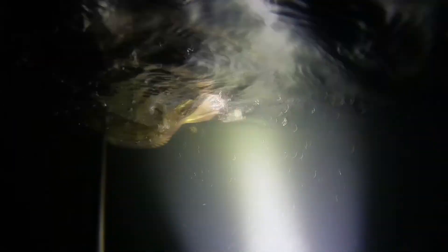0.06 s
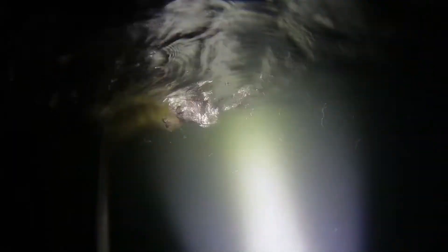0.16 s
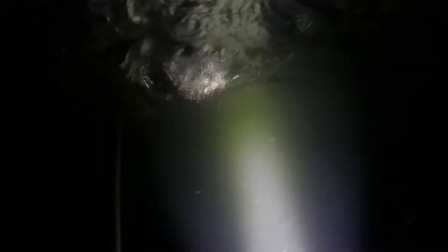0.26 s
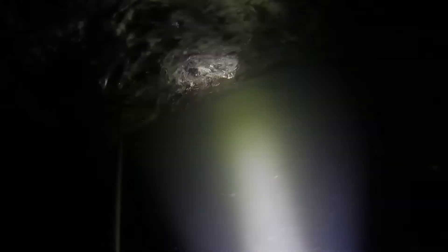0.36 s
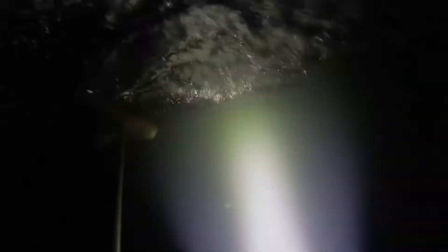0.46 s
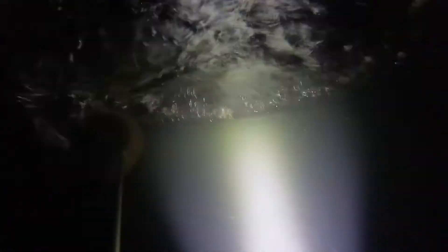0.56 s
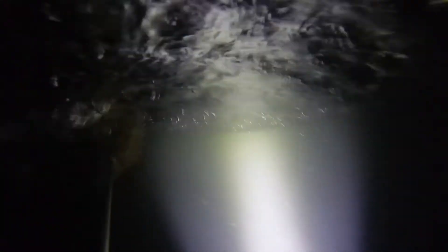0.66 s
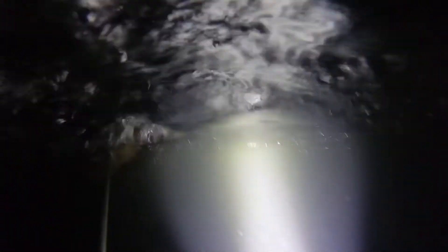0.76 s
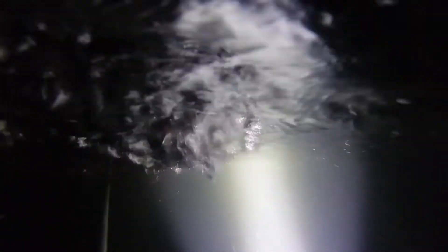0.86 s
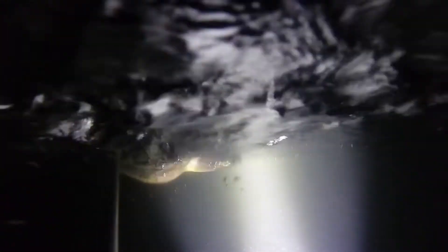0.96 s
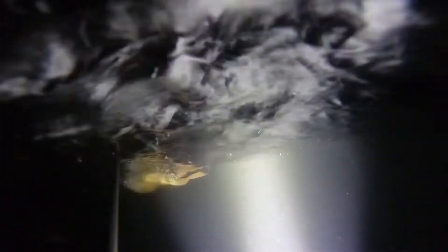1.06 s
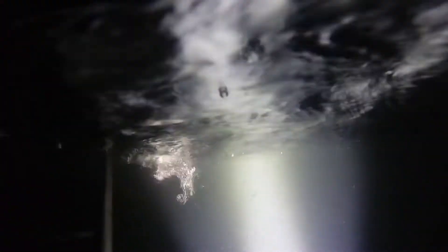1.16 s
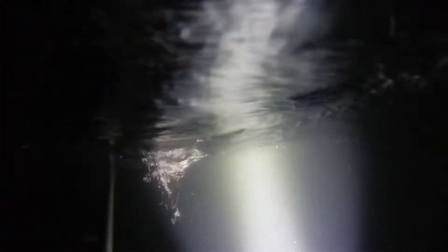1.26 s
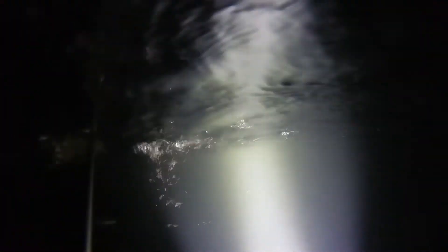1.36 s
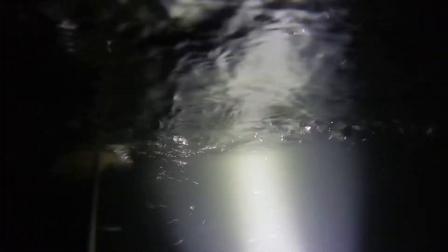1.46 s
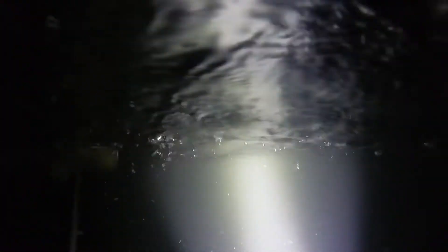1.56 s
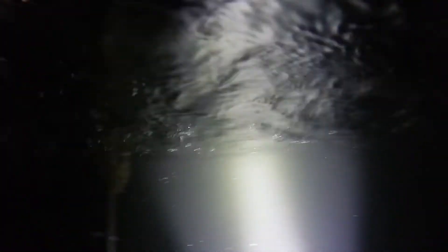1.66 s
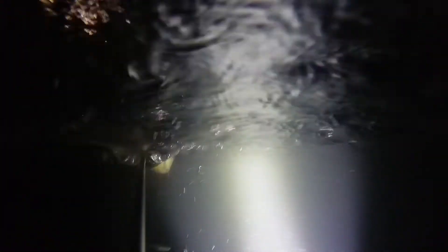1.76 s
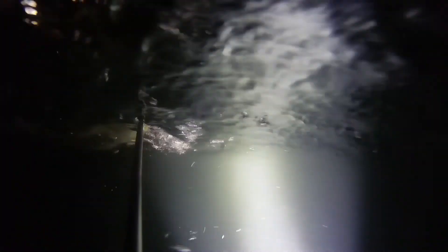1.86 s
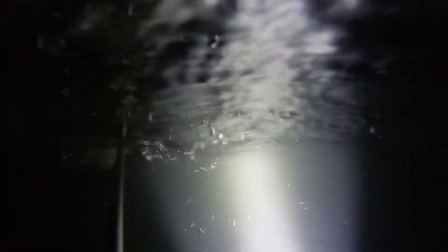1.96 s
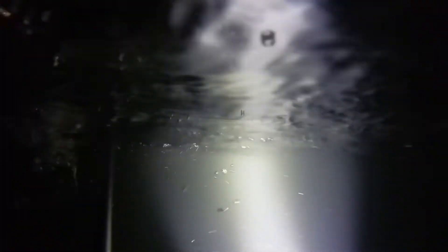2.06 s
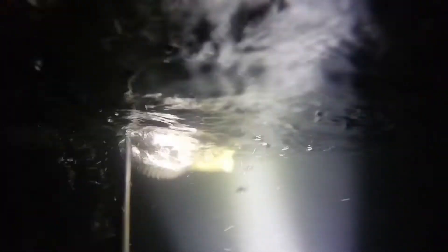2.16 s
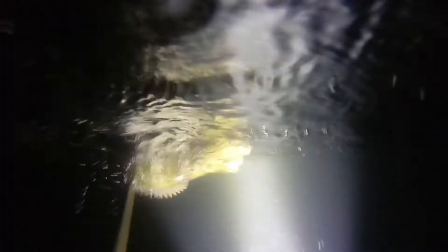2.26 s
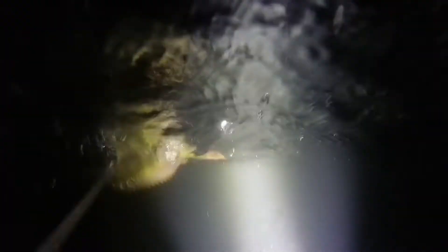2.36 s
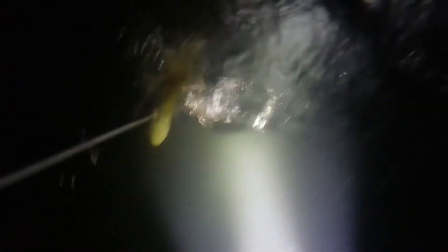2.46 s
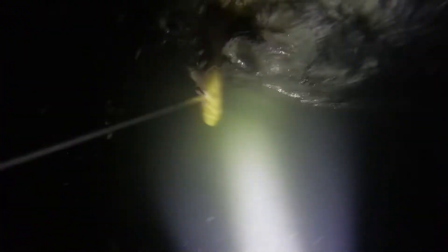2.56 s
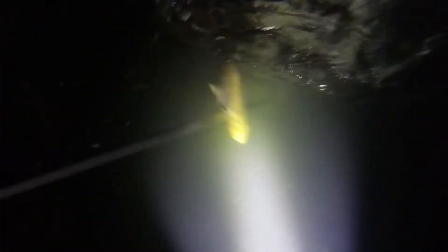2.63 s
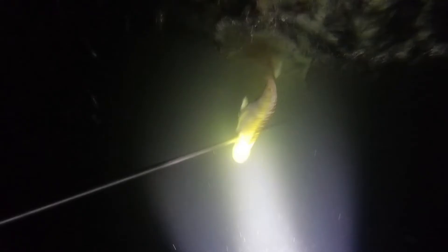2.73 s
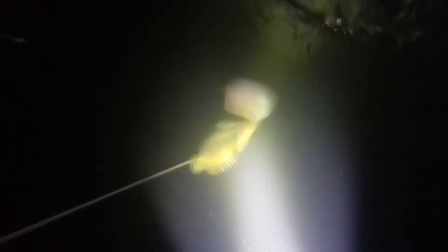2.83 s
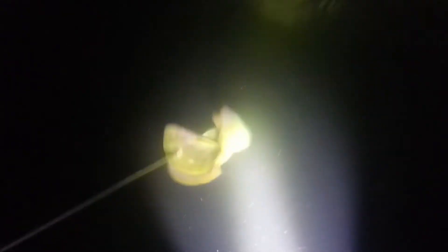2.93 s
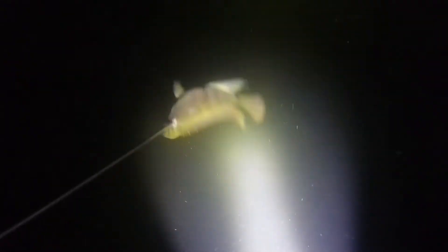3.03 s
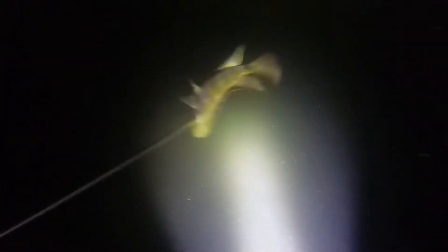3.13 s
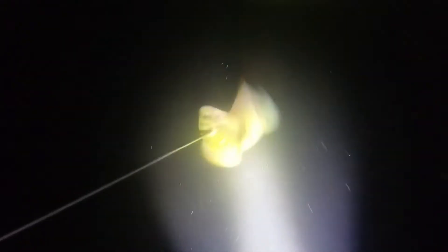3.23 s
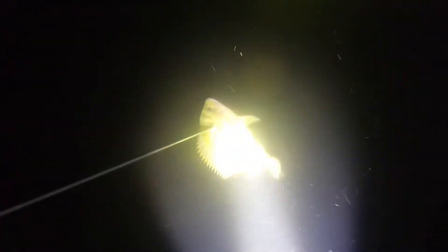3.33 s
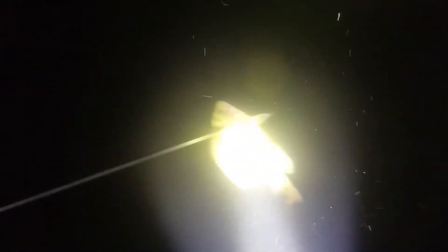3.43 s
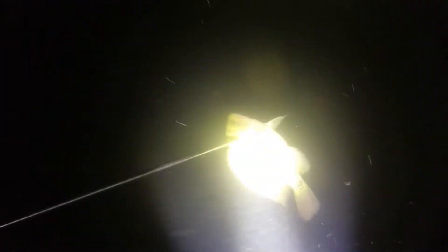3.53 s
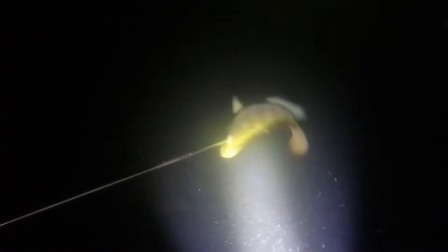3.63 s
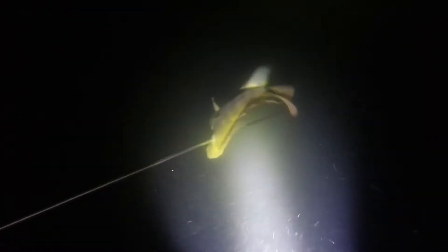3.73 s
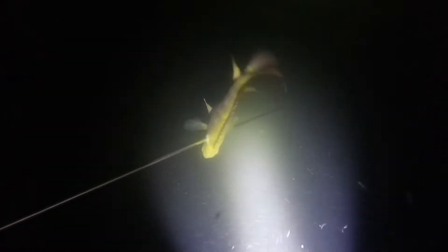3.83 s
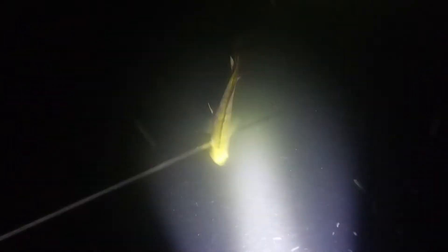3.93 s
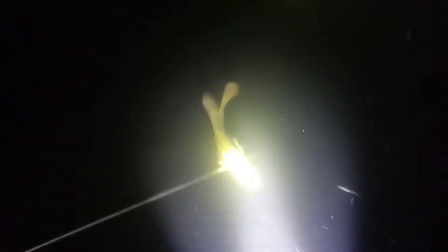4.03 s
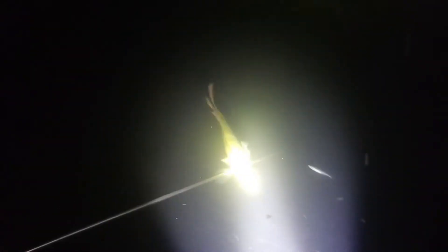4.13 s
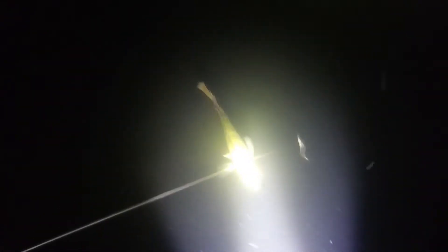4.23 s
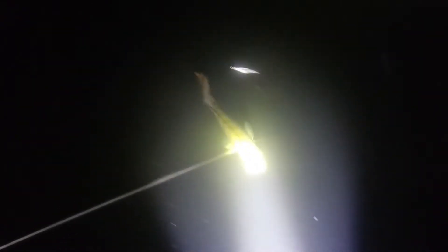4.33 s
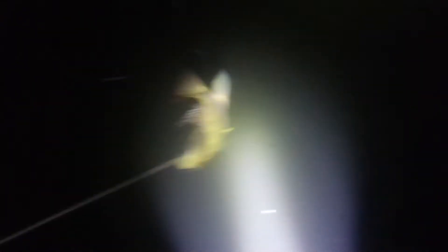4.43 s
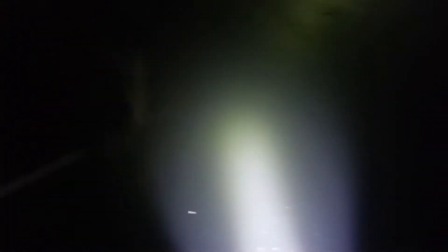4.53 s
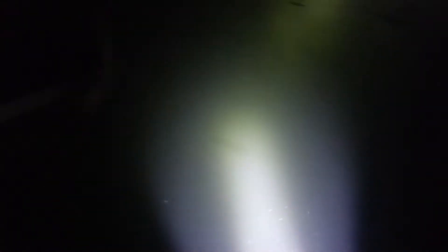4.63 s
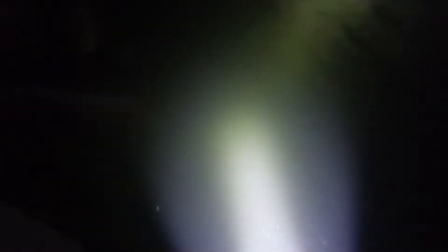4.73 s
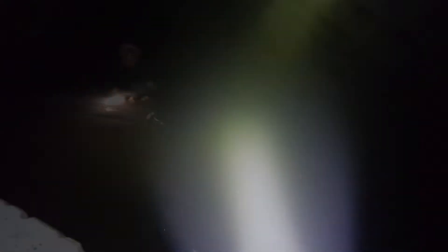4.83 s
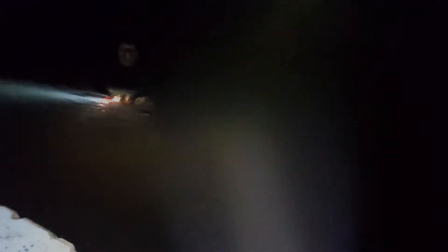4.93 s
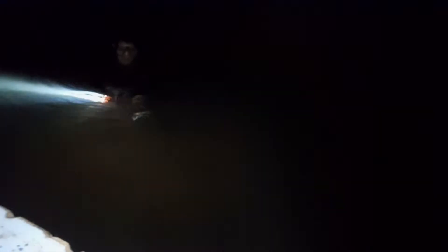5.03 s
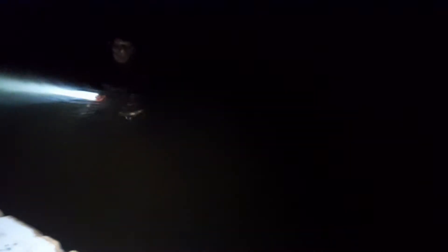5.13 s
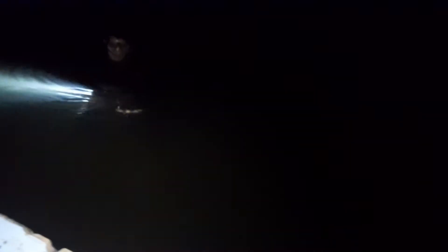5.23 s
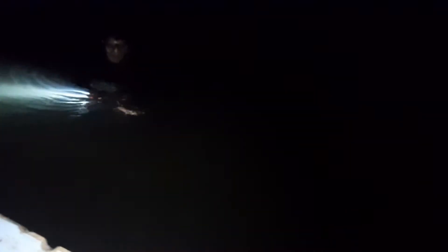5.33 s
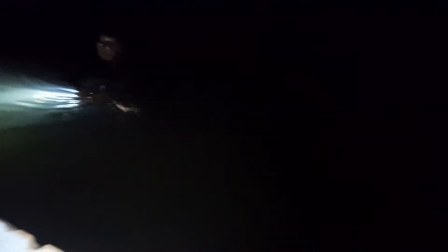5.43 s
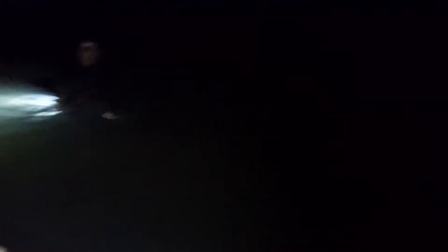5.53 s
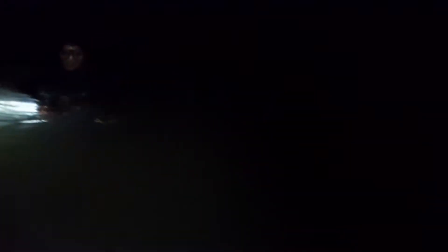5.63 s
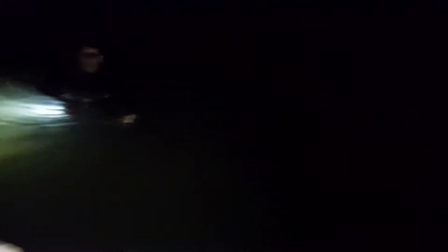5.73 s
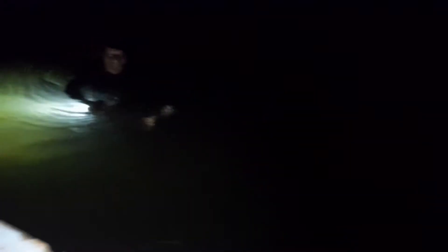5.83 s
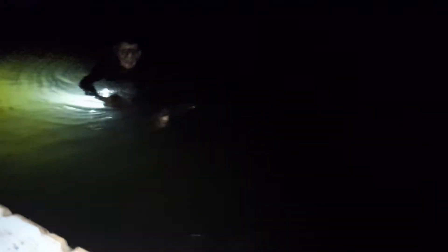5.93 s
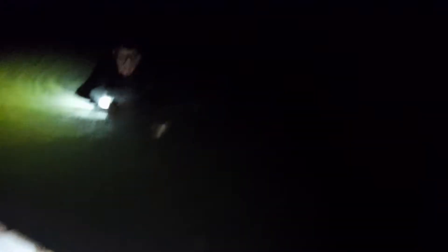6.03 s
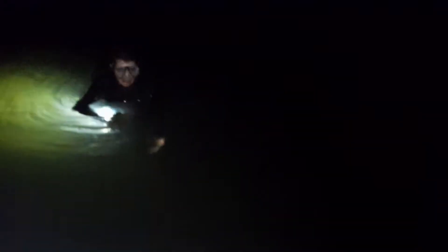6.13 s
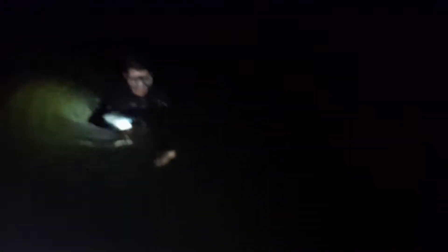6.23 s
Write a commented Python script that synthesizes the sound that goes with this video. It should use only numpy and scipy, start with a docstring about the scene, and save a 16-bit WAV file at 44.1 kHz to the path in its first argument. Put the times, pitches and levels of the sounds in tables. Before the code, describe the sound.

A microphone rides on a fishing spear, very close, underwater in a lake at night. From 0 to 0.35 seconds hard knocks judder rapidly, hollow shaft thuds mixed with bright, short steel rattles, while surging water clips the sound. Until 1.8 seconds there are sparser taps, deep swaying rumbles, gritty rubbing and small gliding bubble tones, with a strong shove near 1.2. Hard knocks return at 1.75-1.95 and 2.25-2.35. At 2.4-2.9 the fish wriggles in faint wet scrapes with bubbles popping. From 3 to 4.4 it is much quieter: subdued water, weak tugs, then a brief low hum at 4.45. At 4.7-5.0 clattering knocks and a distorted wet burst mark surfacing; water patters and gurgles off. A tick sounds near 5.15, then faint hiss, soft bumps and small drips around 5.4 and 5.8-6.0, ending with a dull bump.

```python
"""A fishing spear with a camera on it knocks and sweeps through a lake; it jabs a fish, which wriggles on the prongs.
Knocks ring damped shaft modes and rattle steel modes with noise bursts; many judder on in uneven rebounds.
Strokes stir shaped noise, scales scrape in tiny slips; bubbles, brief resonances and one low hum are gliding sines.
Hard knocks and surging water overload the microphone. Then the camera surfaces: water runs off it,
and a few drips, sharp ticks and soft bumps sound over a faint hiss."""
import sys
import numpy as np
from scipy import signal
from scipy.fft import rfft, irfft, next_fast_len
from scipy.io import wavfile
from scipy.ndimage import uniform_filter1d, map_coordinates

SR = 44100
rng = np.random.default_rng(int(sys.argv[2]) if len(sys.argv) > 2 else 0)


def unload_wav(signal):
    """Save mono or channel-first audio to the path in sys.argv[1] as 16-bit WAV at rate SR, clipped to [-1, 1]."""
    wavfile.write(
        sys.argv[1],
        SR,
        np.round(np.clip(np.atleast_2d(signal).T, -1, 1) * 32767).astype(np.int16),
    )


N = 277414

# Blows on the spear. Each row: start in seconds, relative shaft level in dB, relative steel level in dB,
# judder length in seconds.
KNOCKS = [(0.0, -2, 4, .075), (0.088, -11.5, -14.5, 0.0069), (0.110, -10, -4, .012),
          (0.129, -25, -21, 0.0024), (0.140, -8, -2.5, .013), (0.183, -31, -21, 0), (0.221, -37, -13, 0),
          (0.272, -28, -26, 0), (0.281, -14, -20.5, 0.0086), (0.307, -9.5, -16, .013),
          (0.342, -35, -24, 0.0042), (0.508, -36, -50.5, 0.0039), (0.854, -44.5, -44.5, 0),
          (0.922, -25.5, -45, 0.0011), (0.965, -47, -38, 0), (0.974, -50, -19.5, 0.00047),
          (1.035, -36, -30, 0), (1.088, -60.5, -41.5, 0.01), (1.141, -39, -32.5, 0.0011),
          (1.162, -38, -16.5, .011), (1.228, -29.5, -47, 0.012), (1.255, -20.5, -21.5, .016),
          (1.414, -41, -26, 0), (1.757, -20.5, -8, 0.00016), (1.888, 0.5, -16.5, 0.0036),
          (1.902, -6, -2.5, .027), (1.939, -22.5, -8.5, 0.002), (2.014, -33, -33, 0.00008),
          (2.184, -31, -64.5, 0.00039), (2.225, -34.5, -37, 0), (2.242, -6, -25, 0.0077),
          (2.316, -12.5, 2, .012), (2.333, -22.5, -27.5, 0), (3.134, -26.5, -74, 0.0044),
          (3.513, -35.5, -78, 0.0085), (3.832, -77.5, -59, 0), (4.295, -24, -58, 0.0065),
          (4.697, -42, -39.5, 0), (4.725, -33, -38, 0.00075), (4.743, -13, -17, 0),
          (4.753, -15.5, -1.5, .024), (4.792, -40, -15.5, 0.0055), (4.815, -22, -2, 0),
          (4.833, -40.5, -24, 0), (4.867, -28.5, -39.5, 0.0055), (4.933, -22.5, -16.5, .012),
          (5.021, -43, -27, 0.018)]
# Mean gap between rebounds; their mean loss against the blow and the standard deviation of their levels.
JUDDER_GAP_S, JUDDER_LOSS_DB, JUDDER_SCATTER_DB = 0.0085, 3, 5
# Bending modes of the shaft. Each row: nominal frequency in Hz, relative level in dB, T60 in seconds.
SHAFT_MODES = [(475.1, -1, 0.14), (433, -5.5, 0.051), (490, -15.5, 0.067), (658, -5, 0.019),
               (899, -44, 0.0083)]
# Modes of prongs and fittings. Each row: nominal frequency in Hz, relative level in dB, T60 in seconds.
STEEL_MODES = [(1520, 1, 0.0052), (1746, -7, 0.022), (2522, -0.5, 0.024), (3352, -9, 0.025),
               (3532, -10, 0.037), (4945, -9, 0.02), (5500, -13.5, 0.014), (6150, -16, 0.032),
               (7370, -33.5, 0.11)]

# Fish wriggling on the prongs. Each row: start in seconds, length in seconds, level in dB.
WRIGGLES = [(0.6, .015, -60), (0.845, .015, -62), (0.975, 0.0048, -46), (1.168, 0.015, -45),
            (1.775, .025, -58.5), (2.412, .025, -60.5), (2.467, 0.025, -54.5), (2.529, .018, -43),
            (2.565, 0.031, -54.5), (2.68, .04, -59.5), (2.77, .035, -58.5), (2.877, 0.012, -55.5),
            (3.07, 0.0056, -68.5), (3.515, 0.011, -72.5), (4.44, 0.0379, -67.5)]
WRIGGLE_ATTACK_S, WRIGGLE_RELEASE_S = 0.017, 0.045  # over 60 dB
# Resonances that the scales excite. Each row: nominal frequency in Hz, relative level in dB, T60 in seconds.
WRIGGLE_MODES = [(790, -6, 0.021), (1945, 0, 0.01), (2600, -2, 0.0086), (3390, -12, 0.016),
                 (3540, -11.5, 0.012), (4790, -5, 0.013), (8750, -14, 0.016), (15000, -11.5, .003)]
WRIGGLE_BUBBLES_DB = -6  # against the scraping

# Sweeps of the spear through the water. Each row: start in seconds, length in seconds,
# pressure sway in dB, rumble in dB, rubbing in dB.
STROKES = [(0.0, .1, -34.5, -36.5, -53), (0.125, 0.29, -23.5, -32, -52.5), (0.43, .14, -25, -47, -57.5),
           (0.62, 0.035, -55, -40.5, -56), (0.91, 0.14, -28.5, -42, -52.5), (1.185, .09, -19, -31, -60.5),
           (1.43, 0.68, -28, -47, -55), (1.89, 0.13, -20.5, -32, -55), (2.18, 0.093, -28.5, -39.5, -47),
           (2.26, .12, -29.5, -28.5, -63), (2.43, .37, -41.5, -44, -46), (2.83, 0.089, -40.5, -63, -54.5),
           (3.07, 0.092, -50, -66.5, -66.5), (3.5, 0.069, -57, -68.5, -72), (4.44, .18, -42.5, -50, -59.5),
           (4.71, 0.3, -37.5, -44.5, -55)]
STROKE_ATTACK_S, STROKE_RELEASE_S = 0.17, 0.28  # over 60 dB
# Slow heave of the spear, which also keeps a little water flowing. Each row: time in seconds, level in dB.
HEAVE = [(0, -24.5), (2.3, -30.5), (3, -34.5), (4.2, -36), (5, -30.5), (5.2, -88)]
# Spectrum of the pressure sway. Each row: frequency in Hz, relative level in dB.
SWAY_SPECTRUM = [(10, -13), (18, 2.5), (32, -3), (45, -11.5), (65, -29), (120, -110)]
# Spectrum of the turbulence. Each row: frequency in Hz, relative level in dB.
RUMBLE_SPECTRUM = [(30, -31), (55, -3.5), (90, 0), (150, -19), (230, -23), (400, -82), (800, -120)]
# Spectrum of the rubbing. Each row: frequency in Hz, relative level in dB.
RUB_SPECTRUM = [(100, -27), (220, -4.5), (320, 5), (420, 1.5), (480, 18), (560, -0.5), (680, -4),
                (900, -27), (2500, -34), (5000, -36), (7500, -33), (15000, -49)]
# Hardest shoves of water on the housing. Each row: start in seconds, relative level in dB, length in seconds.
SURGES = [(0.121, -5.5, 0.0076), (0.152, -3.5, .026), (0.288, -11.5, 0.0085), (0.323, 2.5, 0.018),
          (0.382, -10, 0.029), (0.919, -11, 0.033), (1.238, 1, 0.0089), (1.932, -8, 0.0067),
          (2.324, -4.5, 0.013), (4.606, -23, 0.025), (4.781, -0.5, 0.0061), (4.801, -5, 0.0073)]
# Bubbles, brief resonances and one low hum. Each row: start in seconds, frequency in Hz, level in dB,
# T60 in seconds, pitch glide over T60 as a share.
GLIDING_RINGS = [(0.649, 337, -38, 0.057, -0.053), (0.853, 548, -39, 0.11, 0.16),
                 (0.962, 531, -33.5, 0.37, 0.11), (1.036, 520, -32, 0.2, 0.19),
                 (1.414, 392, -25.5, 0.13, 0.49), (2.527, 319.5, -23, 0.11, -0.0036),
                 (2.571, 2020, -30.5, 0.027, -0.44), (2.572, 386, -30, 0.081, 0.032),
                 (2.671, 732, -44.5, 0.28, 0.056), (2.723, 683, -33.5, 0.15, .08),
                 (2.778, 666, -43, 0.15, 0.2), (3.072, 1820, -45.5, 0.054, -.18),
                 (3.906, 676, -61.5, 0.063, 0.053), (4.228, 684, -59.5, 0.25, .03),
                 (4.277, 1856, -63.5, .12, 0), (4.445, 403.5, -41.5, 0.41, -0.063),
                 (4.450, 139.6, -40, 0.76, 0.037), (4.868, 385.1, -16.5, 0.056, 0.13)]

# Sheets of water running off the housing. Each row: start in seconds, length in seconds, level in dB.
RUNOFF = [(4.75, 0.017, -23), (4.81, .025, -36), (4.9, 0.03, -52.5), (4.97, 0.049, -35.5),
          (5.06, 0.15, -59.5), (5.18, .04, -74)]
RUNOFF_ATTACK_S, RUNOFF_RELEASE_S = 0.079, 0.2  # over 60 dB
# Gurgle of the draining housing. Each row: start in seconds, length in seconds, level in dB.
GURGLE = [(4.9, .2, -49)]
# Spectrum of the patter. Each row: frequency in Hz, relative level in dB.
PATTER_SPECTRUM = [(60, -5.5), (120, 11), (220, -6), (470, 11.5), (700, -3), (1300, -9), (2000, -4.5),
                   (3500, -12), (7000, -33.5), (15000, -37.5)]
# Drops falling from the spear into the lake. Each row: start in seconds, frequency in Hz, level in dB,
# T60 in seconds, pitch glide over T60 as a share.
DRIPS = [(5.376, 1025, -61.5, 0.19, -0.062), (5.433, 303, -42.5, 0.29, -0.022),
         (5.822, 1710, -40, 0.065, -0.46), (5.825, 2060, -35.5, 0.04, -0.35),
         (5.893, 1663, -43.5, 0.096, -0.28), (5.925, 933, -53, 0.09, 0.081),
         (5.969, 1920, -44.5, 0.0087, .08)]
# Sharp ticks in air. Each row: start in seconds, relative level in dB.
TICKS = [(5.157, -21), (5.824, -57.5), (6.068, -46)]
# Soft bumps on the housing in air. Each row: start in seconds, relative level in dB, band reference in Hz.
BUMPS = [(5.423, -44, 352), (5.648, -38.5, 597), (5.671, -39, 231), (6.274, -46.5, 226.7)]

# Spectrum of the hiss in air. Each row: frequency in Hz, relative level in dB.
AIR_SPECTRUM = [(30, -42), (60, 22), (150, 12.5), (500, 2.5), (1200, -5), (3300, -12.5), (4000, -10),
                (4450, 1.5), (5000, -6.5), (6300, 2), (7100, 10.5), (8200, -6.5), (15000, -8.5)]
# Largest pressure the wet microphone can follow. Each row: time in seconds, level in dB.
HEADROOM = [(0, -19), (4.7, -20), (4.82, -24), (4.96, -26), (5.05, -22.5), (5.15, -24)]
SURFACE_S = 4.85
TOP_HZ = 15900


def amp(db):
    """Decibels to gain."""
    return 10 ** (np.asarray(db) / 20)


def unit(x):
    """Scale to rms 1."""
    return x / np.sqrt(np.mean(x ** 2) + 1e-20)


def curves(rows):
    """One value per sample for each column after the time."""
    s, *cols = np.transpose(rows)
    return [np.interp(np.arange(N) / SR, s, c) for c in cols]


def wobble(rate_hz):
    """A smooth random curve with rate_hz knots a second."""
    knots = rng.standard_normal(int(N * rate_hz / SR) + 4)
    return map_coordinates(knots, [np.arange(N) * rate_hz / SR])


def swells(rows, attack_s, release_s):
    """Rise, hold and die away for each (start, length, dB, ..) row; one envelope for each dB column."""
    t = np.arange(N) / SR
    rows = np.array(rows)
    start, length = rows[:, :1], rows[:, 1:2]
    before = np.maximum(start - t, 0) / attack_s
    after = np.maximum(t - start - length, 0) / release_s
    shapes = amp(-60 * np.minimum(before + after, 2))
    return np.sqrt(amp(rows[:, 2:].T) ** 2 @ shapes ** 2)


def filtered(x, response):
    """Apply a response of frequency to x."""
    size = next_fast_len(N + SR // 2)
    spectrum = rfft(x, size) * response(np.fft.rfftfreq(size, 1 / SR))
    return irfft(spectrum, size)[..., :N]


def coloured(x, spectrum):
    """Shape x by (Hz, dB) points, at rms 1."""
    f, db = np.transpose(spectrum)
    return unit(filtered(x, lambda hz: amp(np.interp(np.log(hz + 1), np.log(f), db))))


def grains(rate_hz, spread_db, noise):
    """Random tiny impulses of uneven size on a bed of noise."""
    size = amp(spread_db * (2 * rng.random(N) - 1))
    pops = (rng.random(N) < rate_hz / SR) * rng.choice([-1, 1], N) * size
    return unit(pops) + noise * rng.standard_normal(N)


def patchy(x, depth_db):
    """Random patches of gain, about 700 Hz wide and 20 ms long; rms 1."""
    z = signal.stft(x, nperseg=256)[2]
    field = uniform_filter1d(rng.standard_normal(z.shape), size=4, axis=0)
    field = uniform_filter1d(field, size=7, axis=1)
    return unit(signal.istft(z * amp(depth_db * unit(field)), nperseg=256)[1][:N])


def ring(modes, t, scatter_db, detune):
    """Damped modes, randomly detuned at each call; those after the first also vary in strength."""
    out = 0
    for k, (hz, db, t60) in enumerate(modes):
        decay = amp(db + (k > 0) * scatter_db * rng.normal() - 60 * t / t60)
        out = out + decay * np.sin(2 * np.pi * hz * (1 + detune * rng.normal()) * t)
    return out


def cloud(rate_hz, centre_hz, octaves, cycles, spread_db):
    """Many small bubbles of random size and strength, each losing 60 dB over some cycles; rms 1."""
    draws = rng.standard_normal((int(rate_hz * N / SR), 3))
    start = rng.integers(0, N, len(draws))
    hz = np.clip(centre_hz * 2 ** (octaves * draws[:, :1]), 250, 12000)
    n = np.arange(SR // 40)
    age = hz * n / SR  # in cycles
    size = amp(spread_db * np.clip(draws[:, 1:2], -2, 2))
    envelope = size * amp(-60 * age / cycles) * (1 - np.exp(-age))
    glide = 1 + 0.024 * draws[:, 2:] * age / cycles
    pings = envelope * np.sin(2 * np.pi * age * glide)
    return unit(np.bincount((start[:, None] + n).ravel(), pings.ravel(), N)[:N])


def add(track, s, sound):
    """Mix a sound into the track from time s."""
    part = track[max(round(s * SR), 0):][:len(sound)]
    part += sound[:len(part)]


def contacts(count=12):
    """Every blow and the uneven rebounds of its judder: (s, shaft dB, steel dB)."""
    for s, shaft_db, steel_db, length in KNOCKS:
        yield s, shaft_db, steel_db
        delays = np.cumsum(JUDDER_GAP_S * rng.uniform(0.5, 1.5, count))
        changes = JUDDER_SCATTER_DB * rng.standard_normal((count, 2)) - JUDDER_LOSS_DB
        for delay, (shaft_change, steel_change) in zip(delays, changes):
            if delay < length:
                yield s + delay, shaft_db + shaft_change, steel_db + steel_change


def spear(attack_s=0.00071):
    """Each blow bends the shaft, thuds in the housing and sets the steel chattering."""
    out, t = np.zeros(N), np.arange(SR // 3) / SR
    chatter_band = signal.butter(1, [900, 6000], "bandpass", fs=SR)
    thud_band = signal.butter(2, [250, 1100], "bandpass", fs=SR)
    for s, shaft_db, steel_db in list(contacts()):
        # a soft tug of the fish reaches mostly the main bending mode and builds up more slowly
        hardness = min(1, amp((steel_db - shaft_db + 4.0) / 2))
        main_mode = ring(SHAFT_MODES[:1], t, scatter_db=0, detune=0.0084)
        other_modes = ring(SHAFT_MODES[1:], t, scatter_db=8.0, detune=0.017)
        shaft = main_mode + hardness * other_modes
        swell = 1 - np.exp(-(t / (attack_s * (2 - hardness))) ** 2)
        chatter = unit(signal.lfilter(*chatter_band, rng.standard_normal(len(t)))) * amp(-60 * t / 0.016)
        thud = unit(signal.lfilter(*thud_band, rng.standard_normal(len(t)))) * amp(-60 * t / 0.063)
        steel_ring = ring(STEEL_MODES, t, scatter_db=2.5, detune=0.037)
        steel = 0.41 * steel_ring + 0.13 * chatter + 0.23 * thud
        add(out, s, amp(shaft_db) * shaft * swell + amp(steel_db) * steel)
    return out


def fish():
    """Wet scales scrape over the prongs in short bursts of tiny slips and shake bubbles loose."""
    gain, = swells(WRIGGLES, WRIGGLE_ATTACK_S, WRIGGLE_RELEASE_S)
    prongs = ring(WRIGGLE_MODES, np.arange(SR // 30) / SR, scatter_db=1, detune=0.003)
    slips = grains(rate_hz=1300, spread_db=8, noise=0.3)
    scrape = patchy(signal.fftconvolve(slips, prongs)[:N], depth_db=6.5)
    loosened = cloud(rate_hz=400, centre_hz=3000, octaves=0.8, cycles=35, spread_db=5)
    return gain * (scrape + amp(WRIGGLE_BUBBLES_DB) * loosened)


def water():
    """Slow pressure swings, turbulence, rubbing and fizzing bubbles as the spear is swept about."""
    sway_gain, rumble_gain, rub_gain = swells(STROKES, STROKE_ATTACK_S, STROKE_RELEASE_S)
    drift = amp(curves(HEAVE)[0])  # between strokes a little flow remains
    heave = drift * np.sin(2 * np.pi * np.cumsum(7.5 + 2 * wobble(6.7)) / SR)
    swing = signal.hilbert(coloured(rng.standard_normal(N), SWAY_SPECTRUM))
    sway = unit(swing.real / np.sqrt(np.abs(swing) ** 2 + 0.39))  # swings of fairly even size
    rumble = coloured(rng.standard_normal(N), RUMBLE_SPECTRUM)
    rub = coloured(patchy(grains(rate_hz=490, spread_db=8, noise=0.24), depth_db=3.5), RUB_SPECTRUM)
    # scales rasping on the prongs keep the steel faintly ringing
    prongs = ring(STEEL_MODES, np.arange(SR // 10) / SR, scatter_db=0, detune=0.003)
    rasp = unit(signal.fftconvolve(grains(rate_hz=400, spread_db=8, noise=0.3), prongs)[:N])
    fizz = cloud(rate_hz=700, centre_hz=2700, octaves=0.85, cycles=40, spread_db=4)
    rasp_gain = amp(-25.5 + 1.5 * wobble(18))
    fizz_gain = amp(-19 + 5.1 * wobble(42))  # bubbles come in clusters
    churn = amp(3.8 * wobble(31)) * (rub + rasp_gain * rasp + fizz_gain * fizz)
    sways = (sway_gain + amp(-21) * drift) * sway
    rumbles = (rumble_gain + amp(-36.5) * drift) * rumble
    churns = (rub_gain + amp(-46.5) * drift) * churn
    return heave + sways + rumbles + churns


def surges():
    """Successive half-sine shoves of water press the microphone one way, then the other."""
    out = np.zeros(N)
    for k, (s, db, length) in enumerate(SURGES):
        u = np.arange(int(length * SR)) / (length * SR)
        add(out, s, (-1) ** k * amp(db - 4.0) * np.sin(np.pi * u))
    return out


def gliding_rings(rows, attack_s=0.00047):
    """Each bubble, resonance or hum rings as a sine whose pitch glides and quivers as it fades."""
    out, t = np.zeros(N), np.arange(SR // 2) / SR
    for s, hz, db, t60, glide in rows:
        quiver = 0.05 * wobble(221)[:len(t)]
        pitch_hz = hz * (1 + glide * np.minimum(t / t60, 1) + quiver)
        phase = 2 * np.pi * np.cumsum(pitch_hz) / SR
        add(out, s, amp(db - 60 * t / t60) * (1 - np.exp(-t / attack_s)) * np.sin(phase))
    return out


def runoff():
    """Water patters off the housing as grains of noise and gurgles as a cloud of low bubbles."""
    patter_gain, = swells(RUNOFF, RUNOFF_ATTACK_S, RUNOFF_RELEASE_S)
    gurgle_gain, = swells(GURGLE, attack_s=0.13, release_s=0.38)
    patter = coloured(patchy(grains(rate_hz=1500, spread_db=13.0, noise=0.45), depth_db=5), PATTER_SPECTRUM)
    gurgle = cloud(rate_hz=1400, centre_hz=855, octaves=0.16, cycles=35, spread_db=-2)
    return patter_gain * patter + gurgle_gain * gurgle


def drips():
    """Each drop rings a bubble and throws a little spray."""
    out, t = gliding_rings(DRIPS), np.arange(SR // 3) / SR
    for s, hz, db, *_ in DRIPS:
        spectrum = [(hz / 4, -18), (hz, 0), (hz * 2.91, -5), (hz * 6, -22)]
        spray = coloured(grains(rate_hz=990, spread_db=4.5, noise=0.42), spectrum)[:len(t)]
        add(out, s, amp(db - 14.5 - 60 * t / 0.094) * spray)
    return out


def housing_ticks():
    """The housing ticks sharply in the air: quickly fading bursts of shaped noise."""
    out, t = np.zeros(N), np.arange(SR // 4) / SR
    spectrum = [(500, -3.5), (2500, -10.5), (3700, 2.5), (6000, -4.5), (9000, -7.0), (14000, 3.5)]
    for s, db in TICKS:
        snap = coloured(rng.standard_normal(N), spectrum)[:len(t)]
        decay = amp(-60 * t / 0.049) + amp(-30.0 - 60 * t / 0.048)
        add(out, s, amp(db) * decay * (1 - np.exp(-t / 0.0012)) * snap)
    return out


def bumps():
    """Out of the water the housing is bumped softly: fading bursts of band-passed noise."""
    out, t = np.zeros(N), np.arange(SR // 4) / SR
    for s, db, hz in BUMPS:
        band = signal.butter(2, [hz / 1.6, hz * 1.12], "bandpass", fs=SR, output="sos")
        thud = unit(signal.sosfilt(band, rng.standard_normal(len(t))))
        add(out, s, amp(db - 60 * t / 0.163) * (1 - np.exp(-t / 0.0025)) * thud)
    return out


def two_ports(x, lead_s, right_db=-1):
    """Sound in air reaches the left port slightly before the right, and a little louder."""
    right = filtered(x, lambda hz: np.exp(-2j * np.pi * hz * lead_s))
    return np.array([x, amp(right_db) * right])


def background():
    """A steady faint hiss; at the surface a thin whine fades out and a partly stereo air hiss fades in."""
    t = np.arange(N) / SR
    in_air = np.clip((t - SURFACE_S) / 0.064, 0, 1)
    shared, left, right = [coloured(rng.standard_normal(N), AIR_SPECTRUM) for _ in range(3)]
    air = amp(-64.0) * (shared + 0.69 * np.array([left, right]))
    floor_spectrum = [(100, 3.5), (1400, -5.5), (1950, 9), (3000, -4), (15000, -2.5)]
    floor = amp(-79.0 + 0.97 * wobble(32)) * coloured(rng.standard_normal(N), floor_spectrum)
    whine_spectrum = [(11700, -70), (12030, 0), (12150, 0), (12500, -70)]
    whine = amp(-87) * coloured(rng.standard_normal(N), whine_spectrum)
    return in_air * air + floor + (1 - in_air) * whine


def scene():
    """Sound borne by water and shaft reaches both channels alike; sound in air reaches two ports."""
    submerged = spear() + fish() + water() + surges() + gliding_rings(GLIDING_RINGS) + runoff()
    in_air = two_ports(housing_ticks(), lead_s=0.000012) + two_ports(bumps() + drips(), lead_s=0.0001)
    return submerged + in_air + background()


def record(dry, knee=39.0):
    """The microphone saturates abruptly, its port rings slightly at 2500 Hz, and the top band is cut."""
    top = amp(curves(HEADROOM)[0])
    flat = dry / (1 + np.abs(dry / top) ** knee) ** (1 / knee)

    def response(hz):
        """Port resonance, gentle tilt and top cut."""
        damping = 1j * hz * 300
        port = 1 + 0.044 * damping / (2500 ** 2 - hz ** 2 + damping)
        tilt = amp(np.interp(hz, [0, 4000, 9000, 15000], [-1.69, -2.5, -2.0, -1.7]))
        return port * tilt * (hz < TOP_HZ)

    return filtered(flat, response)


dry = scene()
out = record(dry)
unload_wav(out)
```